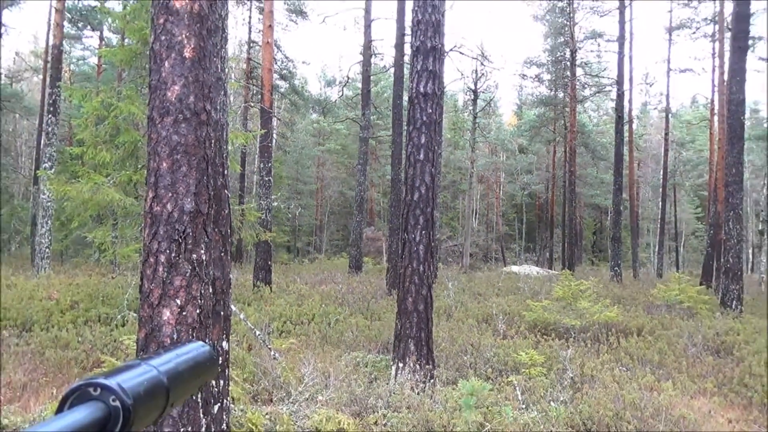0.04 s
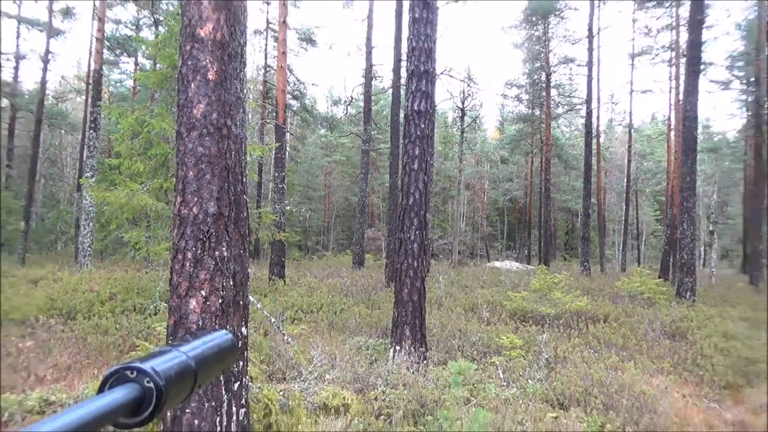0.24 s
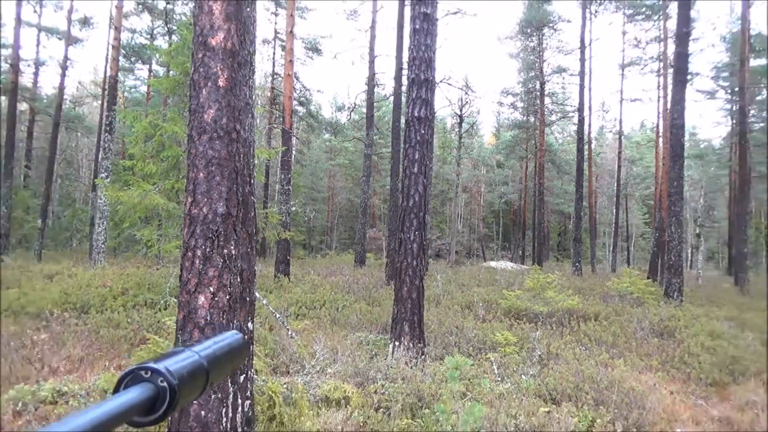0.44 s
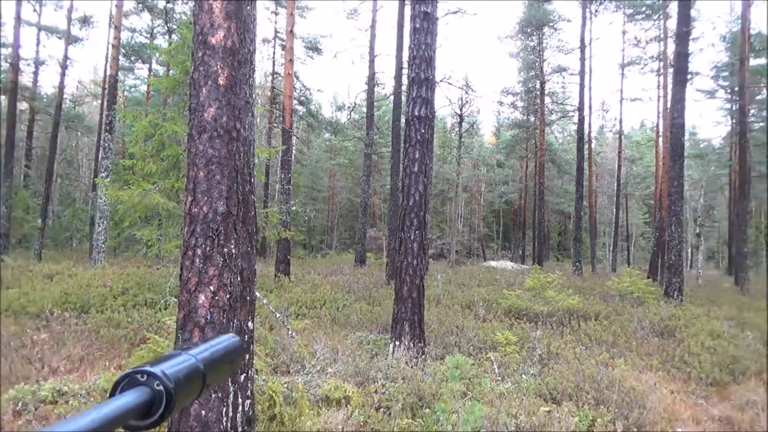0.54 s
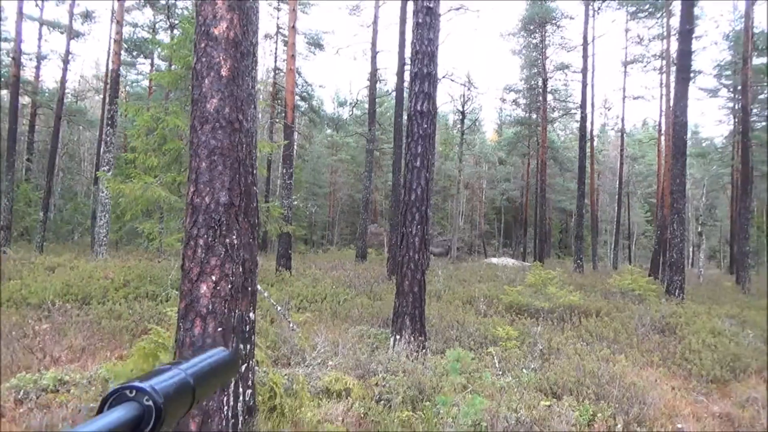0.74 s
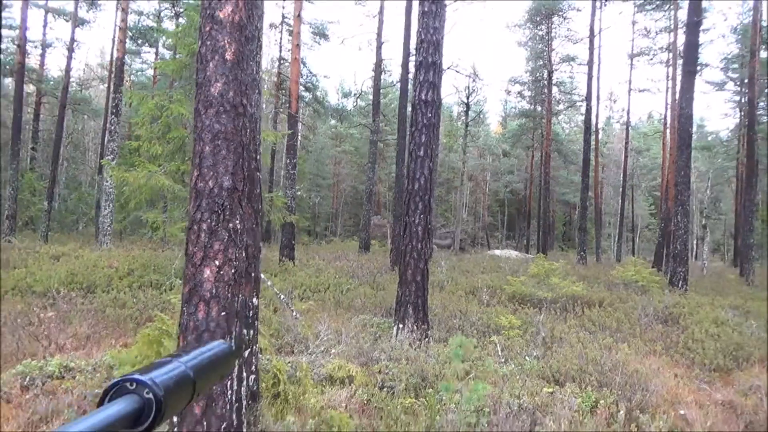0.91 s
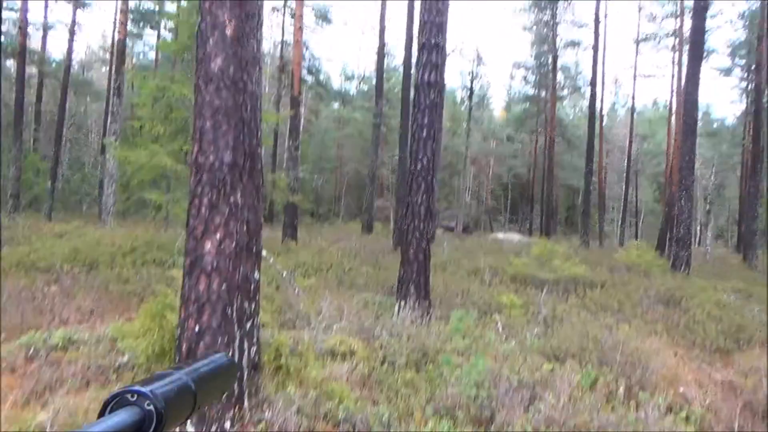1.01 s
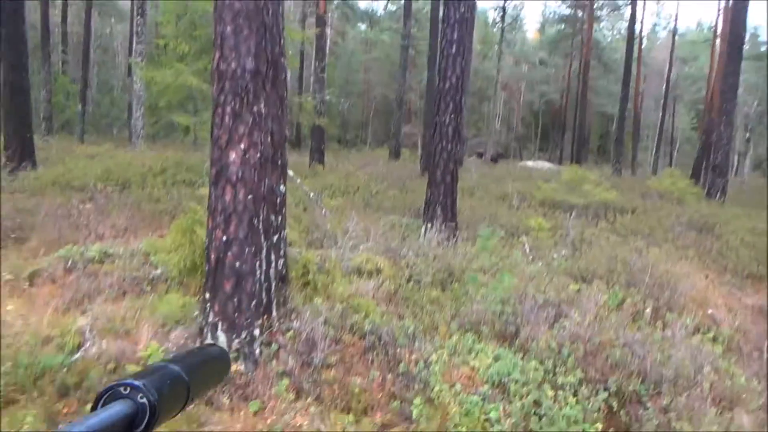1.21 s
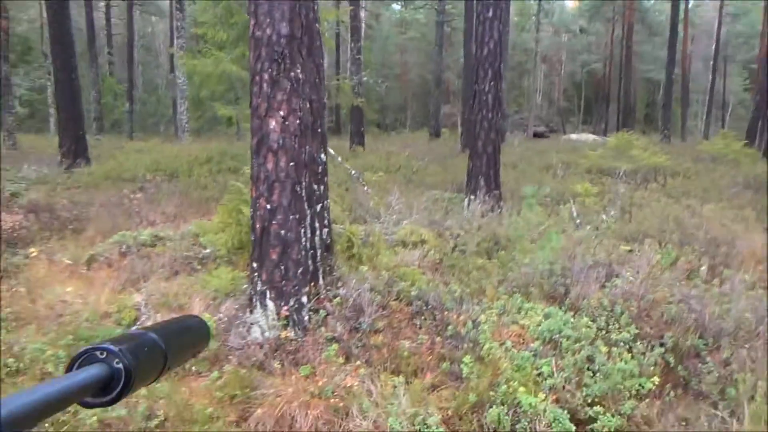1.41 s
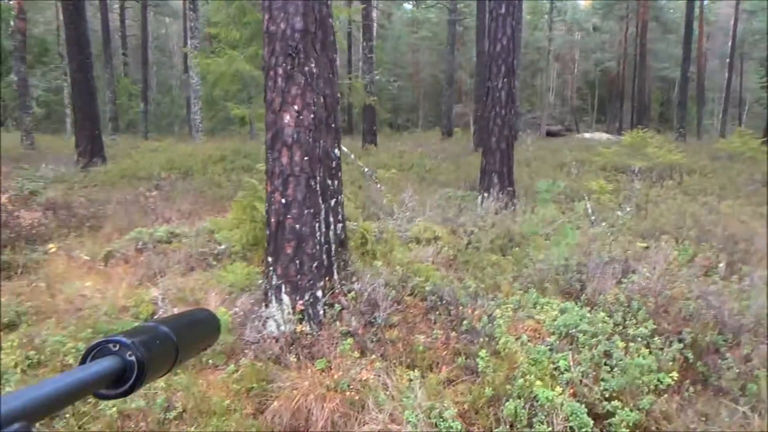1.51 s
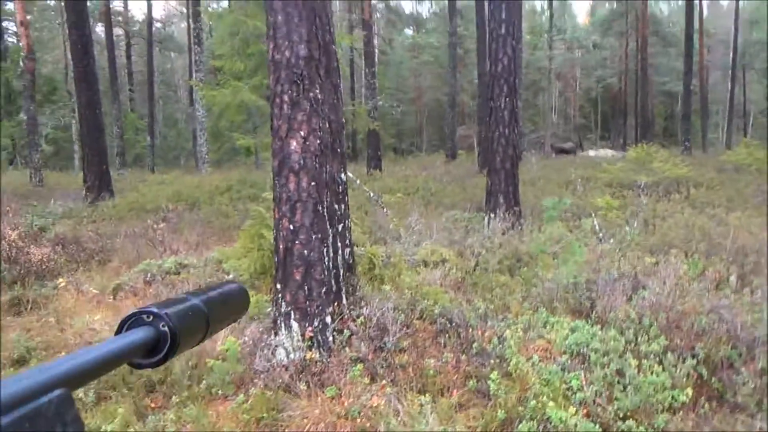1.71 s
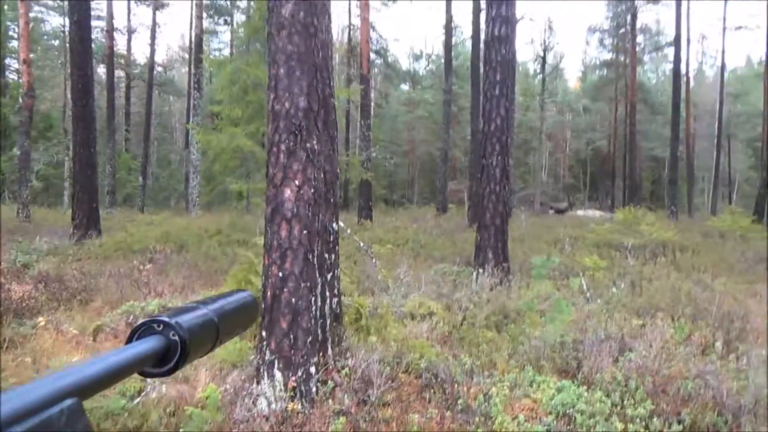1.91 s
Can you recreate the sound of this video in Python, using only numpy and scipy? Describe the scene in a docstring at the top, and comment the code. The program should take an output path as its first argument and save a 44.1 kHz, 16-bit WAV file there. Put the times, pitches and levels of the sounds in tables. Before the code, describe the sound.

A rifle's action clacks close to the microphone in a quick metallic cluster, ending with a hand's thud on the stock. Soft sleeve rustle, small ticks and bumps follow over faint wind in a forest.

```python
"""Rifle handled in a pine forest

The action clacks close to the microphone: each impact excites the modes of metal parts and stock,
and the hand thuds on the stock. As the rifle is lowered, sleeves rustle by friction, gear and twigs
tick, and air buffets the moving microphone. Light wind in the trees and a thin hiss lie underneath,
and the ground and near trunks return a short diffuse reflection."""
import sys
import numpy as np
from scipy import signal
from scipy.fft import rfft, irfft
from scipy.io import wavfile
from scipy.ndimage import uniform_filter1d

SR = 44100
rng = np.random.default_rng(int(sys.argv[2]) if len(sys.argv) > 2 else 0)


def int16_out(signal):
    """Quantize to a 16-bit WAV file."""
    q = np.round(np.clip(np.atleast_2d(signal).T, -1, 1) * 32767)
    wavfile.write(sys.argv[1], SR, q.astype(np.int16))


N = 85995
AGE = np.arange(8192) / SR  # time since an impact [s]

# Direction of sleeves and ticks: (time [s], left minus right [dB])
HANDLING_PAN = [(0, 0), (1.15, 1.5), (1.45, 5.5), (1.95, 3.3)]


def undb(db):
    """Amplitude ratio of a level in decibels."""
    return 10 ** (np.asarray(db) / 20)


def unit_rms(x):
    """Normalisation to unit power."""
    return x / np.sqrt(np.mean(x ** 2))


def unit_energy(x):
    """Normalisation to unit energy."""
    return x / np.sqrt(np.sum(x ** 2))


def curve(rows):
    """Linear interpolation of (time [s], value) points."""
    return np.interp(np.arange(N) / SR, *np.array(rows, float).T)


def response(spectrum, size):
    """Magnitude response through (frequency [Hz], level [dB]) points on a logarithmic axis."""
    hz, db = np.array(spectrum, float).T
    bins = np.maximum(np.fft.rfftfreq(size, 1 / SR), 1)
    return undb(np.interp(np.log(bins), np.log(hz), db))


def colour(x, spectrum):
    """Zero-phase filtering by multiplication of spectra."""
    return irfft(rfft(x) * response(spectrum, len(x)), len(x))


def butterworth(x, hz, kind="lowpass", order=2):
    """Filtering with a maximally flat passband."""
    return signal.sosfilt(signal.butter(order, hz, kind, fs=SR, output="sos"), x)


def drift(rate_hz):
    """Smoothed random steps give a slow fluctuation of unit power."""
    step = int(SR / rate_hz)
    stairs = np.repeat(rng.standard_normal(N // step + 1), step)
    return unit_rms(uniform_filter1d(stairs, step)[:N])


def stereo(mid, side, pan_db=0):
    """Sum and difference give left and right; a level difference sets the direction."""
    return np.array([(mid + side) * undb(pan_db / 2), (mid - side) * undb(-pan_db / 2)])


def wash(source, spectrum, side_db, pan_db=0):
    """Decorrelation: independent noise of the same colour widens a filtered source."""
    side = undb(side_db) * unit_rms(colour(rng.standard_normal(N), spectrum))
    return stereo(unit_rms(colour(source, spectrum)), side, pan_db)


def add(out, start, x):
    """Superposition of a sound from its start time [s]."""
    i = int(start * SR)
    out[i:i + len(x)] += x[:N - i]


def wind():
    """Turbulence in the trees radiates broadband noise, its level wavering slightly."""
    # Wind and hiss: (frequency [Hz], level [dB])
    spectrum = [(15, -33), (25, -58), (112, -11.5), (187, -9.5), (247, -10.5), (319, -5.5), (492, -6.5),
                (531, -7), (573, -4.5), (819, -17.5), (930, -15), (1510, -14), (1630, -19), (2930, -19),
                (11000, -24.5), (14300, -116), (22000, -120)]
    # Stereo width: (frequency [Hz], side minus mid [dB])
    width = [(40, 8), (120, 0), (300, -16), (1000, -10.5), (3000, -11.5), (10000, -7)]
    mid, side = (unit_rms(colour(rng.standard_normal(N), spectrum)) for _ in range(2))
    return stereo(mid, colour(side, width)) * undb(-58.5 - 0.33 * drift(rate_hz=5.3))


def contact(chatter_s, feedback=0.82):
    """Contact chatter: three all-pass loops turn an impulse into irregular, dying bounces."""
    force = (AGE == 0) * 1.
    for gap_s in chatter_s * np.geomspace(.06, .3, 3) * rng.uniform(.85, 1.15, 3):
        loop = np.r_[1, np.zeros(int(gap_s * SR)), feedback]
        force = signal.lfilter(loop[::-1], loop, force)
    return force


def ring(modes):
    """Free vibration is a sum of damped modes; neighbours swing in opposite senses."""
    return sum((-1) ** k * undb(db) * np.sin(2 * np.pi * hz * AGE) * 1000 ** (-AGE / t60)
               for k, (hz, db, t60) in enumerate(modes))


def metal_ring(t60_at_1khz=0.035):
    """Damping of the metal parts grows with frequency, so high modes die first."""
    # Modes of the metal: (frequency [Hz])
    frequencies = [915, 1030, 1391, 1522, 1790, 1946, 2195, 2402, 2520, 2800, 3145, 3905, 4180, 4420]
    # Strength of each mode: (level [dB])
    levels = [1, -8.5, 1.5, -1, 1.5, 0.5, 3.5, 3.5, -8, -23, -2.5, 2, 3, 7]
    return ring((hz, db, t60_at_1khz * (1000 / hz) ** 0.82) for hz, db in zip(frequencies, levels))


def stock_ring(pitch=1, hold=1):
    """The low, strongly damped modes of the stock give a thud."""
    # Modes of the stock: (frequency [Hz], level [dB], T60 [s])
    modes = [(133, -10, 0.054), (247.6, -9, 0.058), (360, -0.5, 0.043), (500, 1.5, 0.024), (634, -8, 0.035),
             (900, -7, 0.019)]
    return ring((hz * pitch, db, t60 * hold) for hz, db, t60 in modes)


def crack(size=1024):
    """A minimum-phase pulse packs the energy of its spectrum as early as causality allows."""
    # Impact click: (frequency [Hz], level [dB])
    spectrum = [(60, -26), (200, -0.5), (500, -15), (800, -4.5), (1500, -3.5), (2800, 1), (4200, 5.5),
                (5200, -8.5), (6400, -6), (7300, -11.5), (9600, -3.5), (11000, -8)]
    cepstrum = irfft(np.log(response(spectrum, size)))
    return irfft(np.exp(rfft(2 * cepstrum[:size // 2], size)))


def action():
    """Impact excitation: each contact force is convolved with the metal, stock and crack responses."""
    # Knocks: (time [s], ring [dB], crack [dB], thud [dB], contact cut-off [Hz], chatter length [s])
    knocks = [(0.2223, -26.5, -35, -45, 2350, .002), (0.2278, -28, -35, -48, 1940, 0.0011),
              (.3230, -24, -26.5, -31.5, 1420, .002), (0.3243, -37, -32, -23.5, 6840, .004),
              (0.356, -28, -42, -40, 3870, 0.0038), (0.3639, -32, -21, -41, 6650, .0015),
              (.3650, -13.5, -19.5, -30, 3630, .001), (0.3711, -17, -37, -24, 3160, 0.0017),
              (.3730, -20.5, -23.5, -55, 2800, 0.00072), (0.3818, -17, -13, -45, 10200, 0.0011),
              (0.3833, -18.5, -23, -62, 5000, .001), (0.3846, -45, -21, -32, 4500, 0.0017),
              (0.404, -34, -30.5, -34, 5960, 0.014), (0.4194, -24, -24, -41, 1760, 0.0046),
              (0.4233, -28.5, -38, -30.5, 5000, 0.0045), (0.4474, -35, -27, -28.5, 12000, 0.0012)]
    metal, stock, click = metal_ring(), stock_ring(), crack()
    out = np.zeros(N)
    for start, ring_db, crack_db, thud_db, cutoff_hz, chatter_s in knocks:
        force = butterworth(contact(chatter_s), cutoff_hz, order=4)
        for body, db in (metal, ring_db), (stock, thud_db), (click, crack_db):
            vibration = signal.fftconvolve(force, body)[:len(AGE)]
            add(out, start, undb(db) * unit_energy(vibration))
    return out * undb(4)


def ticks():
    """Tiny snaps of gear and twigs each excite one broad resonance."""
    # Dry ticks: (time [s], level [dB], centre [Hz], bandwidth [Hz], chatter length [s])
    snaps = [(0.2236, -56, 2200, 900, .001), (0.2257, -20.5, 1780, 900, .0015),
             (0.796, -22, 1500, 1730, 0.00041), (1.0558, -32, 1400, 3900, 0.00033),
             (1.125, -33, 1100, 3000, 0.0025), (1.147, -35, 1470, 700, 0.0034),
             (1.148, -39, 4500, 600, 0.0016), (1.4025, -27, 2550, 1110, .0005),
             (1.4361, -27, 1690, 2600, .001), (1.4405, -26.5, 854, 600, .002),
             (1.523, -30.5, 1160, 2360, .0015), (1.526, -26, 850, 296, 0.0022),
             (1.662, -29, 900, 450, 0.0016), (1.726, -29.5, 2970, 800, 0.0022),
             (1.729, -29, 930, 500, 0.0015)]
    out = np.zeros(N)
    for start, db, centre_hz, width_hz, chatter_s in snaps:
        low_hz = np.hypot(centre_hz, width_hz / 2) - width_hz / 2  # centre is the geometric mean
        tick = butterworth(contact(chatter_s), [low_hz, low_hz + width_hz], "bandpass")
        add(out, start, undb(db) * unit_energy(tick))
    return out * undb(0.5)


def hand_bumps():
    """A soft contact acts as a low-pass; only the stock rings, longer under a loose grip."""
    # Blows of the hand: (time [s], level [dB], pitch [ratio], ring time [ratio], contact cut-off [Hz])
    blows = [(0.2263, -27, 0.66, 1.8, 330), (0.3213, -21.5, 0.88, 0.91, 700), (.4463, -8, 1.01, 1.18, 1340),
             (.509, -33, 0.9, 0.88, 1200), (1.1421, -21, 0.836, 2.9, 430), (1.344, -30, 1.16, 1.3, 1500),
             (1.441, -21.5, 1.5, 1.8, 2500), (1.661, -23.5, .97, 1.8, 1500), (1.922, -29, 1.1, 2.3, 2500)]
    out = np.zeros(N)
    for start, db, pitch, hold, cutoff_hz in blows:
        thud = butterworth(stock_ring(pitch, hold), cutoff_hz)
        add(out, start, undb(db) * unit_energy(thud))
    return butterworth(out, 104, "highpass", order=4) * undb(2)


def buffeting():
    """Turbulent pressure on the moving microphone is heard as a low rumble."""
    # Rumble envelope: (time [s], level [dB])
    envelope = [(0, -77), (.29, -77.5), (.33, -53), (.47, -61), (.55, -89), (.8, -71.5), (.95, -66),
                (1.1, -87), (1.2, -57), (1.27, -54), (1.35, -49.5), (1.43, -56), (1.53, -69), (1.66, -58.5),
                (1.85, -70), (1.95, -60)]
    # Rumble colour: (frequency [Hz], level [dB])
    spectrum = [(20, -17), (45, -12), (75, -0.5), (110, -4.5), (170, -16.5), (400, -40)]
    return wash(rng.standard_normal(N), spectrum, side_db=-9.5) * undb(curve(envelope))


def fibres(catches_per_s=3500, spread_db=19):
    """Stick-slip friction: cloth fibres catch and release in random impulses of bounded size."""
    catches = rng.random(N) < catches_per_s / SR
    signs = np.sign(rng.standard_normal(N))
    return unit_rms(catches * signs * undb(spread_db * rng.random(N)))


def sleeves(flicker_db=1.56):
    """Friction noise of cloth swells in uneven strokes, with a fine swish on top."""
    # Rubbing strokes: (time [s], level [dB])
    rub_envelope = [(0, -72), (.3, -63.5), (.41, -52), (.48, -62.5), (.56, -59.5), (.72, -57.5), (.81, -52),
                    (.87, -57), (1.0, -61), (1.09, -59), (1.14, -57), (1.22, -59), (1.38, -56),
                    (1.45, -51.5), (1.53, -49.5), (1.58, -55), (1.72, -55.5), (1.85, -59.5), (1.95, -55.5)]
    # Rubbing colour: (frequency [Hz], level [dB])
    rub_spectrum = [(100, -18.5), (200, -9.5), (310, 5.5), (500, -6), (700, -2), (900, 2.5), (1150, -7),
                    (1450, -6), (2000, -7.5), (3200, -10), (5000, -15.5), (11000, -21)]
    # Swish strokes: (time [s], level [dB])
    swish_envelope = [(0, -71.5), (.7, -59.5), (.85, -61.5), (1.1, -65.5), (1.3, -62.5), (1.42, -56.5),
                      (1.53, -52.5), (1.62, -56.5), (1.68, -65), (1.76, -58.5), (1.95, -70)]
    # Swish colour: (frequency [Hz], level [dB])
    swish_spectrum = [(1000, 17), (3500, 2), (6000, -6.5), (7500, -6), (9500, 8), (11000, 2.5)]
    rub = wash(fibres(), rub_spectrum, side_db=-16, pan_db=curve(HANDLING_PAN))
    rub *= undb(curve(rub_envelope) + flicker_db * drift(rate_hz=60))
    swish = wash(fibres(), swish_spectrum, side_db=-7) * undb(curve(swish_envelope))
    return rub + swish


def scatter(x, t60, cutoff_hz):
    """Diffuse reflection acts as convolution with exponentially decaying noise."""
    tail = rng.standard_normal(N) * 1000 ** (-np.arange(N) / SR / t60)
    return signal.fftconvolve(x, unit_energy(butterworth(tail, cutoff_hz, order=1)))[:N]


def scene():
    """Superposition of direct sound, reflections from ground and trunks, and moving air."""
    rifle, ticking = action() + hand_bumps(), ticks()
    treble = butterworth(rifle, 4800, "highpass")
    side = 0.22 * scatter(treble, t60=0.018, cutoff_hz=12000)  # the treble differs between the ears
    direct = stereo(rifle, side, pan_db=0.7) + stereo(ticking, 0, pan_db=1.5 + curve(HANDLING_PAN))
    reflections = np.array([scatter(rifle + ticking, t60=0.089, cutoff_hz=5000) for _ in range(2)])
    return direct + undb(-21) * reflections + sleeves() + wind() + buffeting()


def record(dry, cutoff_hz=11080):
    """Band limiting: a steep elliptic low-pass removes the highest treble."""
    return signal.sosfilt(signal.ellip(10, .2, 70, cutoff_hz, fs=SR, output="sos"), dry)


dry = scene()
out = record(dry)
int16_out(out)
```